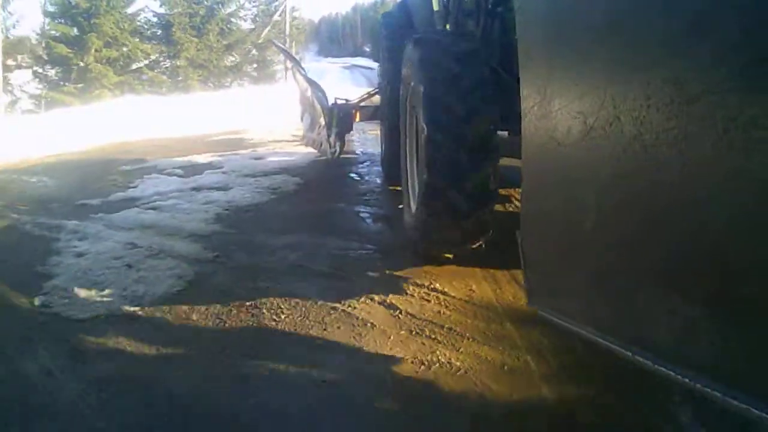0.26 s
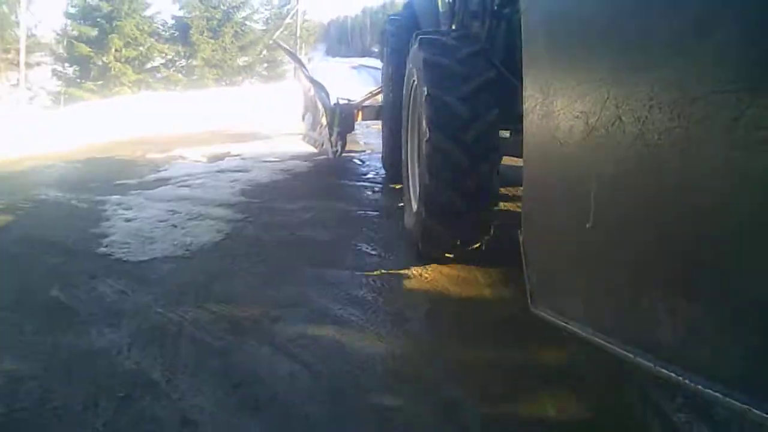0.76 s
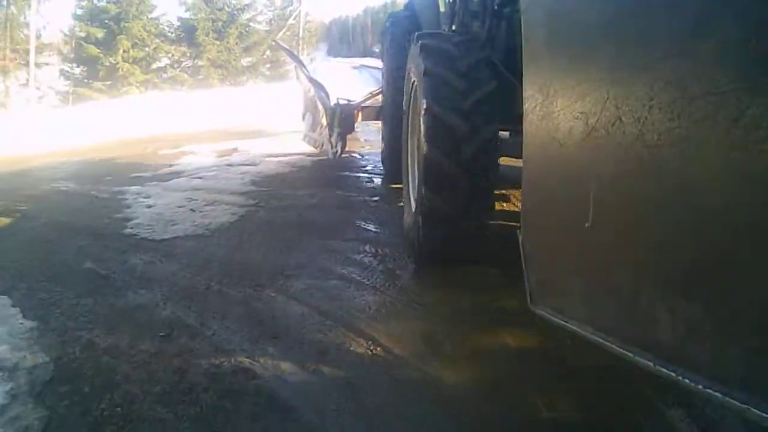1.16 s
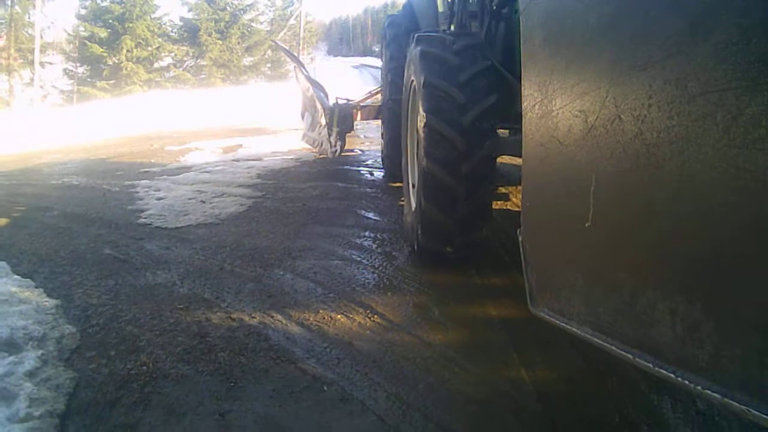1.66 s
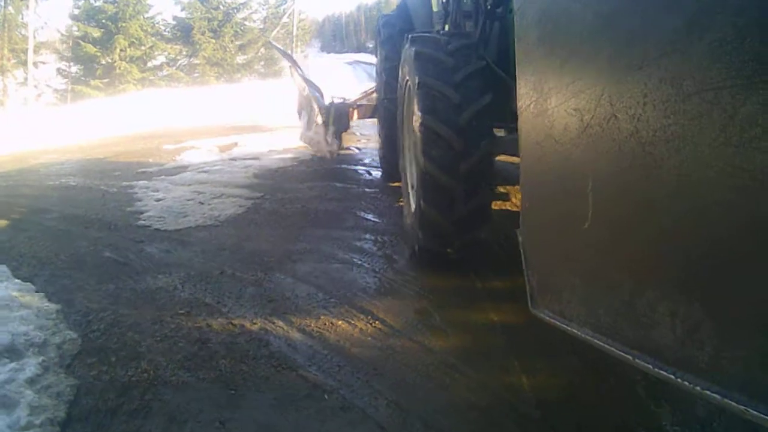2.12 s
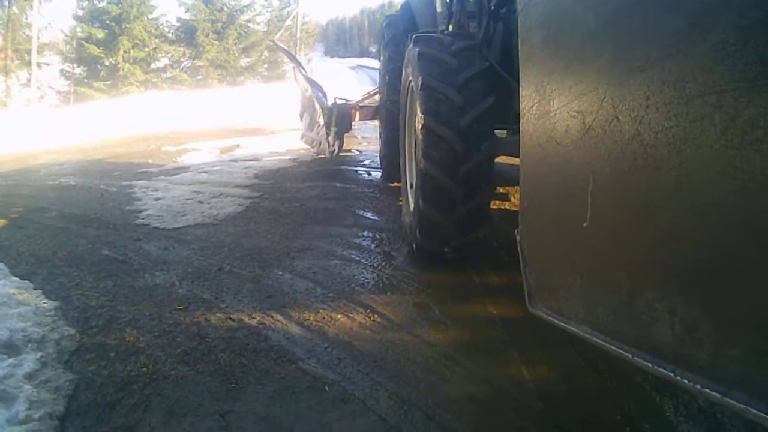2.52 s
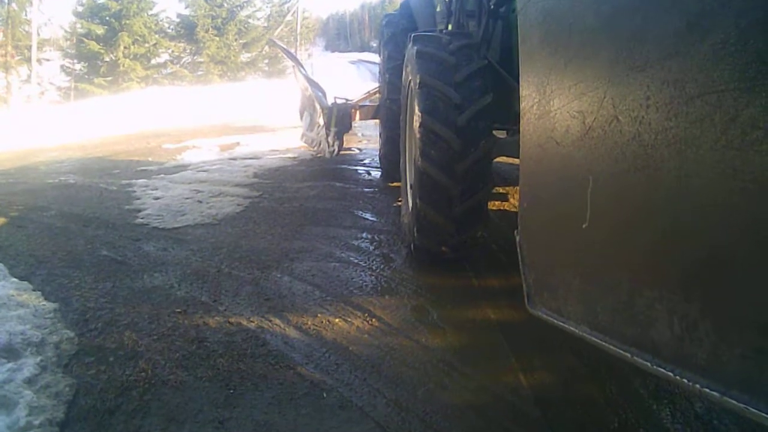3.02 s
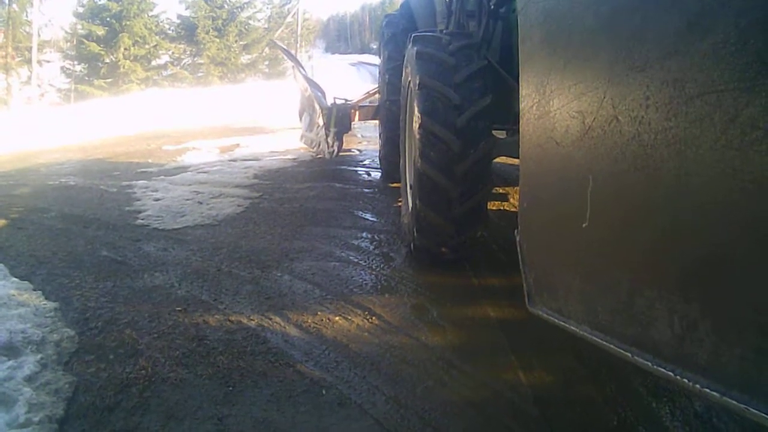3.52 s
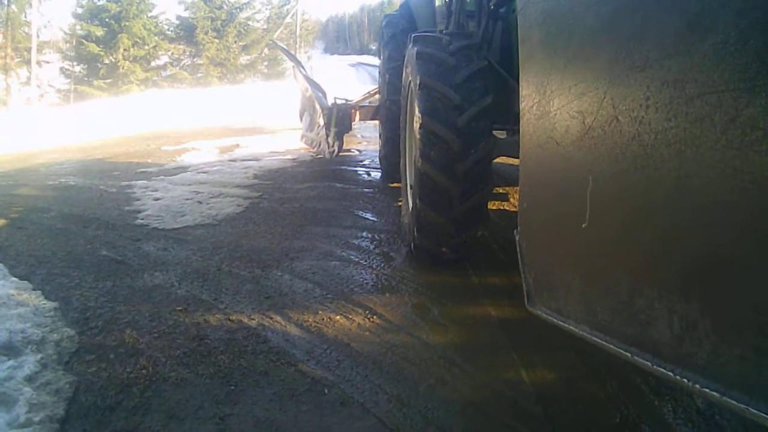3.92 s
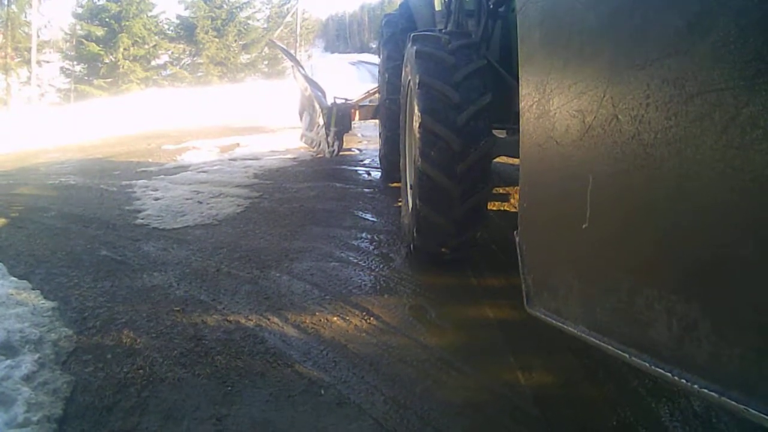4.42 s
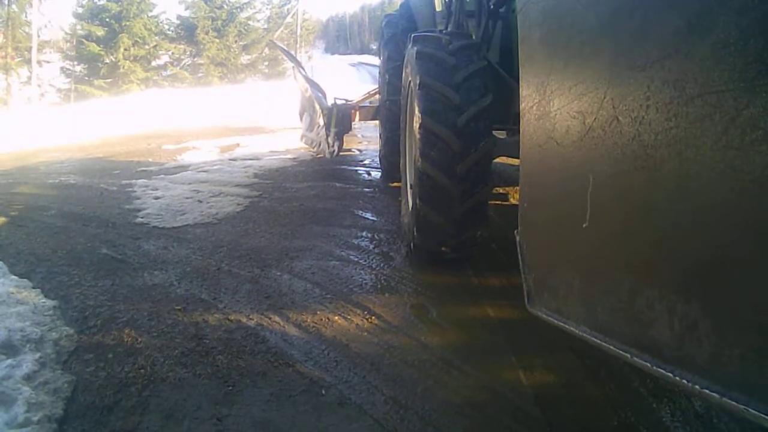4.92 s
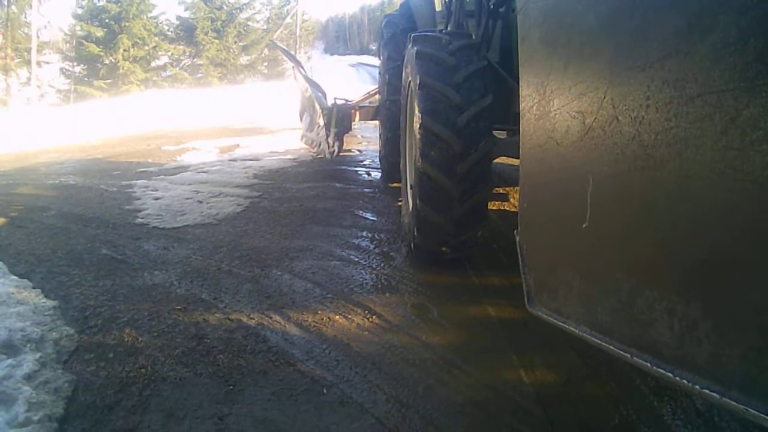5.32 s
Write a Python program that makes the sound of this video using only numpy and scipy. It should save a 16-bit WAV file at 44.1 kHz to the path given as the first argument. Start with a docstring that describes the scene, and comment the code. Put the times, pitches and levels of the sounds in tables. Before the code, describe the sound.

Microphone fixed to the side of a diesel tractor outdoors, very close and dry. A steady low engine drone runs throughout. At first heavy tyres drum and loose steel bangs hard; the drumming slows, a big distorted heave and clatter hits just after two seconds, then the tyres fall silent and the engine continues with short metal rattles.

```python
"""On a wet road, close up: a microphone fixed to the side of a diesel tractor with a snow plow.
From the start the engine drones on summed sines, its gears whine and filtered noise fills the rest.
The tyre lugs drum ever more slowly, with a heave near 2.25 s, and have faded by about 3.2 s.
To the end the rig's loose steel rattles in bouts timed to the engine: filtered blows and noise bursts.
The loudest moments clip the microphone, with short bursts of filtered noise around the clipped peaks."""
import sys
import numpy as np
from scipy import signal
from scipy.fft import rfft, irfft, next_fast_len
from scipy.io import wavfile
from scipy.ndimage import map_coordinates

SR = 44100
rng = np.random.default_rng(int(sys.argv[2]) if len(sys.argv) > 2 else 0)


def bounce(signal):
    """Save signal as a 16-bit WAV file at the path given by the first command-line argument."""
    frames = np.transpose(np.atleast_2d(signal))
    limited = np.clip(frames, -1, 1)
    pcm = np.round(limited * 32767).astype(np.int16)
    wavfile.write(sys.argv[1], SR, pcm)


N = 245617

# strength of the engine drone: (time [s], level [dB])
DRONE_LEVEL = [(0, -13.5), (0.9, -20), (1.7, -21.5), (2.4, -15), (3.1, -18), (3.6, -17), (5.57, -15.5)]
# engine orders within the drone: (multiple of crankshaft speed [1], relative level [dB])
ENGINE_ORDERS = [(1, -20.5), (1.5, -24), (2, 4), (3, -8), (4, -7.5), (5, -18.5), (6, -22.5)]
# gear whine: (multiple of crankshaft speed [1], level [dB])
GEAR_WHINES = [(49.3, -43), (56.45, -37), (58.2, -45)]
# colour of the broad mechanical noise: (frequency [Hz], relative gain [dB])
MACHINE_COLOUR = [(20, -12.5), (60, -8), (92, -16.5), (150, -20), (350, -23.5), (430, -44), (560, -23),
                  (950, -59), (1300, -100), (2500, -130)]
# colour of the gearbox noise: (frequency [Hz], relative gain [dB])
GEARBOX_COLOUR = [(750, -38), (980, -20), (1090, -4), (1175, -11), (1280, 1), (1410, -9), (1490, -8),
                  (1680, -28), (2000, -23), (3200, -39), (3900, -65), (5600, -63), (7200, -51),
                  (9500, -100)]

# drumming of the tyre lugs: (time [s], fundamental level [dB], overtone level [dB])
LUG_LEVELS = [(0, -13.5, -20), (0.27, -6.5, -19.5), (0.65, -20.5, -26), (1.1, -20, -12),
              (1.32, -17.5, -22.5), (1.74, -16, -25.5), (1.81, -17.5, -2), (1.92, -18, -12.5),
              (2.15, -18.5, -4.5), (2.6, -21, -11.5), (3.2, -50, -52)]
# overtones of the lugs: (multiple of lug rate [1], relative level [dB])
LUG_OVERTONES = [(2, -0.5), (3, -12), (4, -16.0)]
# the frame heaving on its tyres: (time [s], level [dB])
HEAVE_LEVEL = [(0, -15.5), (0.22, -8), (0.5, -15.5), (0.8, -22), (1.6, -27.5), (2.15, -7), (2.25, 3),
               (2.38, -9.5), (2.7, -20.5), (5.57, -26)]
# colour of the heave: (frequency [Hz], relative gain [dB])
HEAVE_COLOUR = [(3, -17), (8, -2.0), (17, -5.5), (30, -9.5), (60, -30.5), (200, -130)]
# colour of the booming side panel: (frequency [Hz], relative gain [dB])
BOOM_COLOUR = [(30, -27.5), (55, -4.5), (66, 3.5), (85, -8.5), (115, -5), (150, -18),
               (250, -52), (600, -130)]

# bouts in which the rig shakes: (start [s], length [s], thud level [dB], clank level [dB])
SHAKING_BOUTS = [(0.029, 0.31, -12, -15), (0.386, 0.19, -11, -22.5), (0.58, 0.062, -14, -25),
                 (0.806, 0.14, -20, -31), (1.017, 0.11, -13.5, -20.5), (1.15, 0.1, -17, -27),
                 (1.556, 0.098, -19.5, -31), (1.772, 0.11, -14.5, -23), (1.96, 0.1, -11, -17),
                 (2.064, 0.43, -9, -14.5), (2.526, 0.51, -16, -24.5), (3.169, 0.25, -12, -21),
                 (3.564, 0.25, -11, -18), (3.886, 0.108, -12, -22.5), (4.065, 0.058, -13, -22.5),
                 (4.245, 0.1, -13, -24.5), (4.438, 0.27, -11.5, -21), (4.791, 0.058, -14, -24.5),
                 (4.97, 0.2, -9, -17), (5.359, 0.36, -11, -22)]
# where loose parts strike in each crankshaft turn: (share of the turn [1], relative level [dB])
STRIKE_PLACES = [(0.06, 0.5), (0.47, 3), (0.71, -3), (0.93, -5)]
# low response of the struck steel: (frequency [Hz], gain [dB])
THUD_RESPONSE = [(30, -24.5), (90, -1.5), (170, -1.5), (280, 0.5), (400, -3.5), (520, -5), (650, -19),
                 (900, -22.5), (1500, -56), (5000, -130)]
# bright response of the struck steel: (frequency [Hz], gain [dB])
CLANK_RESPONSE = [(350, -37), (620, 1), (730, -4), (795, 4), (880, -6.5), (1000, -3.5), (1120, 0.5),
                  (1300, -1.5), (1500, -1), (1750, -12.5), (2200, -18.5), (3000, -24.5), (3700, -33),
                  (6000, -130)]
# the hardest knocks, each heard from this moment: (time [s], relative level [dB])
HARDEST_KNOCKS = [(0.037, -7), (0.083, -7), (0.126, -5), (0.144, -4), (0.189, -4.5), (0.232, -7),
                  (0.279, -7.5), (0.434, -4.5), (0.534, -11), (0.854, -11), (1.012, -11.5), (1.072, -11),
                  (1.19, -11), (1.248, -9.5), (1.556, -9), (1.662, -12.5), (1.822, -8), (1.962, -5),
                  (1.997, -5), (2.064, -6.5), (2.079, -3), (2.122, -3.5), (2.187, -3.5), (2.25, -0.5),
                  (2.294, -0.5), (2.343, -4.5), (2.385, -2.5), (2.451, -7), (2.473, -5), (2.634, -6),
                  (2.68, -4.5), (2.864, -15), (3.006, -8.5), (3.172, -9.5), (3.683, -10.5), (3.772, -10.5),
                  (4.44, -11), (5.191, -11), (5.452, -10.5)]

# the microphone after its overload: (frequency [Hz], gain [dB])
MIC_RESPONSE = [(3000, 0), (4500, -3), (7000, -3), (8200, -10), (9500, -21), (12000, -20), (15500, -12)]
# colour of the noise added around each clipped peak: (frequency [Hz], relative gain [dB])
CLIP_NOISE_COLOUR = [(600, -25.5), (1800, -5.5), (3000, 3), (4200, 8.5), (5800, 3.5), (7200, 6.5),
                     (8300, -9.5), (9500, -52), (15000, -41.5)]

TURNS_PER_S = 22.1  # crankshaft speed
# lugs per second at the start, and the time in which the pace falls to 1/e
LUG_RATE, COAST_S = 49, 3.1
# a bout swells, sags while it lasts and dies away
BOUT_ATTACK_S, BOUT_SAG_DB_PER_S, THUD_RELEASE_S, CLANK_RELEASE_S = 0.016, 3, 0.057, 0.016
# the rig never rests entirely
REST_THUD_DB, REST_CLANK_DB = -30, -39.5
# timing scatter of the strikes: at rest, and what rolling at the starting pace adds
SCATTER_S, ROLLING_SCATTER_S = 0.001, 0.004
TOP_HZ = 16000  # upper limit of the recorder


def amp(db):
    """Decibels to gain."""
    return 10 ** (np.asarray(db) / 20)


def unit(x):
    """Scale to rms 1."""
    return x / np.sqrt(np.mean(x ** 2) + 1e-20)


def curves(rows):
    """One value per sample for each column after the time."""
    times, *columns = np.transpose(rows)
    return [np.interp(np.arange(N) / SR, times, column) for column in columns]


def wobble(rate):
    """A smooth random curve with rate knots a second."""
    knots = rng.standard_normal(int(N * rate / SR) + 4)
    return map_coordinates(knots, [np.arange(N) * rate / SR])


def coloured(x, points):
    """A causal minimum-phase filter with the gain of the (frequency [Hz], gain [dB]) points."""
    m = 2 * next_fast_len(N // 2 + SR // 4)
    hz, db = np.transpose(points)
    gain = amp(np.interp(np.log(np.fft.rfftfreq(m, 1 / SR) + 1), np.log(hz), db))
    # folding the cepstrum onto positive time makes the filter causal
    cepstrum = irfft(np.log(gain), m)
    cepstrum[1:m // 2] *= 2
    cepstrum[m // 2 + 1:] = 0
    response = np.exp(rfft(cepstrum))
    return irfft(rfft(x, m) * response, m)[:N]


def noise(points):
    """Coloured noise of rms 1."""
    return unit(coloured(rng.standard_normal(N), points))


def engine(turns):
    """Low engine orders, mechanical noise pulsing twice a turn, gearbox noise and gear whine."""
    drone = np.zeros(N)
    for order, db in ENGINE_ORDERS:
        phase = 2 * np.pi * (order * turns + rng.random()) + 0.39 * wobble(9)
        drone += amp(db + 1.3 * wobble(9)) * np.sin(phase)
    drone_db, = curves(DRONE_LEVEL)

    machine = amp(-22.5) * noise(MACHINE_COLOUR)
    gearbox = amp(-34.5 + 0.71 * wobble(4.9)) * noise(GEARBOX_COLOUR)
    firing = 1 + 0.23 * np.cos(2 * np.pi * 2 * turns)

    whine = np.zeros(N)
    for ratio, db in GEAR_WHINES:
        phase = 2 * np.pi * ratio * turns + 0.6 * wobble(20)
        whine += amp(db + 2.5 * wobble(7)) * np.sin(phase)
    return amp(drone_db) * drone + firing * (machine + gearbox) + np.sqrt(2) * whine


def pace(t):
    """Rolling speed of the tractor as a share of its starting speed, falling exponentially."""
    return np.exp(-t / COAST_S)


def tyres():
    """The lugs drum on the road while the frame heaves slowly on the rubber."""
    rate = LUG_RATE * pace(np.arange(N) / SR)
    phase = 2 * np.pi * (np.cumsum(rate) / SR + rng.random())
    first_db, overtone_db = curves(LUG_LEVELS)
    first = amp(first_db + 1.7 * wobble(14)) * np.sin(phase)
    overtones = np.zeros(N)
    for k, db in LUG_OVERTONES:
        overtones += amp(db + 3.25 * wobble(14)) * np.sin(k * phase + 0.41 * wobble(14))
    drum = np.sqrt(2) * (first + amp(overtone_db) * overtones)

    heave_db, = curves(HEAVE_LEVEL)
    heave = amp(heave_db) * noise(HEAVE_COLOUR)
    # the side panel booms as the frame rocks
    boom = amp(0.55 * heave_db - 9.5) * noise(BOOM_COLOUR)
    return drum + heave + boom


def contacts(times, sizes, sway, chatter_s, chatter):
    """Force of loose parts meeting: a blow along the frame's swing, then a chatter that swells and dies."""
    t = np.arange(SR // 12) / SR
    force = np.zeros(N + len(t))
    for time, size in zip(times, sizes):
        start = int(np.clip(time * SR, 0, N - 1))
        burst = rng.standard_normal(len(t)) * np.sqrt(t) * np.exp(-t / chatter_s)
        burst *= chatter / np.linalg.norm(burst)
        burst[0] += np.sign(sway[start])
        force[start:][:len(t)] += size * burst
    return force[:N]


def shaking(levels_db, rest_db, release_s):
    """Gain of the rattle: each bout rises quickly to its level, sags a little and dies away."""
    t = np.arange(N) / SR
    gain = np.full(N, amp(rest_db))
    for (start, length, *_), level_db in zip(SHAKING_BOUTS, levels_db):
        age = t - start
        # the rise ends at the start of the bout
        rise = np.clip(1 + age / BOUT_ATTACK_S, 0, 1)
        sag_db = BOUT_SAG_DB_PER_S * np.clip(age, 0, length)
        fall = np.exp(-np.maximum(age - length, 0) / release_s)
        gain = np.maximum(gain, amp(level_db - sag_db) * rise * fall)
    return gain


def rattle(sway):
    """Loose parts strike near fixed places in each turn, less evenly while the tractor rolls."""
    share, place_db = np.transpose(STRIKE_PLACES)
    turn = np.arange(int(TURNS_PER_S * N / SR))[:, None]
    beats = (turn + share).ravel() / TURNS_PER_S
    # random columns: timing, strength, delay of the rebound
    chance = rng.standard_normal((len(beats), 3))
    scatter_s = SCATTER_S + ROLLING_SCATTER_S * pace(beats)
    times = beats + scatter_s * chance[:, 0]
    sizes = amp(np.resize(place_db, len(beats)) + 2.03 * chance[:, 1])
    # each blow rebounds more softly, typically a few milliseconds later
    times = np.append(times, times + 0.005 + 0.002 * chance[:, 2])
    sizes = np.append(sizes, amp(-8.5) * sizes)

    thud_force = contacts(times, sizes, sway, chatter_s=0.0035, chatter=0.77)
    clank_force = contacts(times, sizes, sway, chatter_s=0.0019, chatter=2.7)
    thud = unit(coloured(thud_force, THUD_RESPONSE))
    clank = unit(coloured(clank_force, CLANK_RESPONSE))
    _, _, thud_db, clank_db = np.transpose(SHAKING_BOUTS)
    thud_gain = shaking(thud_db, REST_THUD_DB, THUD_RELEASE_S)
    clank_gain = shaking(clank_db, REST_CLANK_DB, CLANK_RELEASE_S)
    return thud_gain * thud + clank_gain * clank


def knocks(sway):
    """The hardest blows set the same steel ringing; the harder, the brighter."""
    times, db = np.transpose(HARDEST_KNOCKS)
    thud = contacts(times + 0.001187, amp(db + 44), sway, chatter_s=0.002, chatter=0.55)
    strike = contacts(times, amp(1.39 * db + 21.5), sway, chatter_s=0.0021, chatter=6.98)
    # the parts grind against each other for a moment before they settle
    grind = contacts(times + 0.001987, amp(1.8 * db + 12), sway, chatter_s=0.0042, chatter=8.5)
    return coloured(thud, THUD_RESPONSE) + coloured(strike + grind, CLANK_RESPONSE)


def overload(x):
    """The microphone clips hard; a short burst of filtered noise is added around each clipped peak."""
    ceiling = 0.7  # share of full scale
    clipped = np.clip(x, -ceiling, ceiling)
    highpass = signal.butter(8, 5000, "highpass", fs=SR, output="sos")
    treble = signal.sosfilt(highpass, clipped)
    # the added noise follows the local rms of the clipped signal's treble, over 3.9 ms
    window = signal.windows.hann(round(0.0039 * SR))
    power = signal.fftconvolve(treble ** 2, window / window.sum(), "same")
    strength = np.sqrt(np.abs(power))
    bursts = amp(1.0) * strength * noise(CLIP_NOISE_COLOUR)
    # the bursts ride under the same ceiling
    return np.clip(coloured(clipped, MIC_RESPONSE) + bursts, -ceiling, ceiling)


def scene():
    """Everything reaches the microphone from close by, with no echo added."""
    turns = TURNS_PER_S * np.arange(N) / SR
    sway = engine(turns) + tyres()
    return (sway + rattle(sway) + knocks(sway))[None]


def record(dry):
    """The overloaded microphone feeds a recorder of limited bandwidth."""
    edges = signal.windows.tukey(N, 0.001)  # short fades at both ends
    m = next_fast_len(N + SR // 2)
    spectrum = rfft(edges * overload(dry[0]), m)
    passband = np.fft.rfftfreq(m, 1 / SR) < TOP_HZ
    return irfft(spectrum * passband, m)[None, :N]


dry = scene()
out = record(dry)
bounce(out)
```